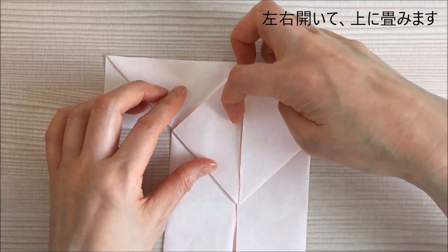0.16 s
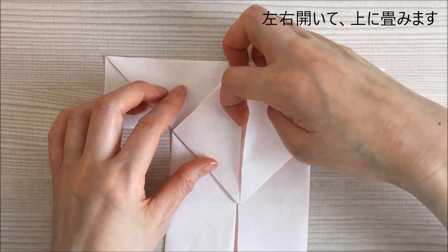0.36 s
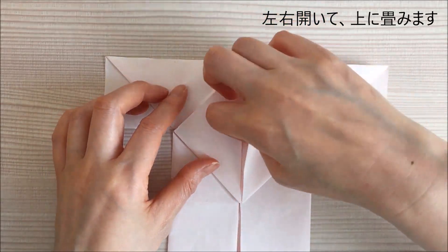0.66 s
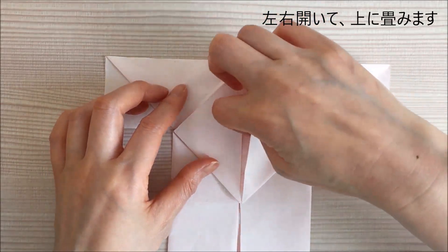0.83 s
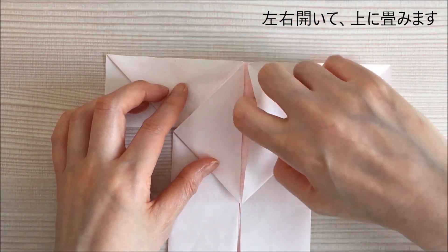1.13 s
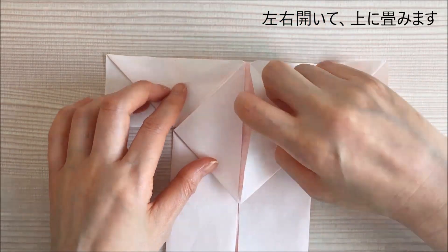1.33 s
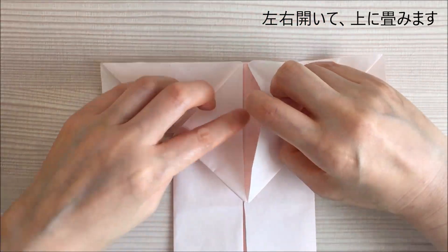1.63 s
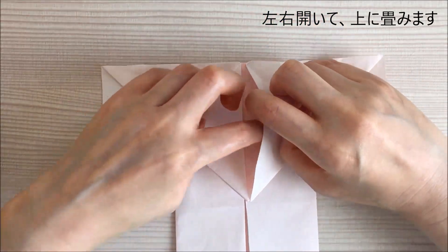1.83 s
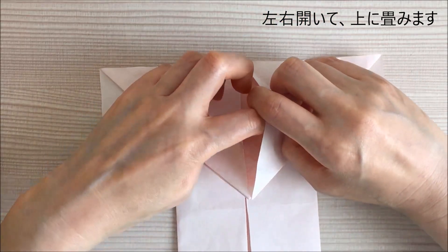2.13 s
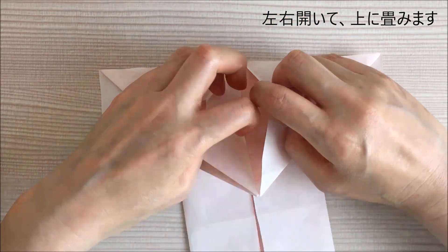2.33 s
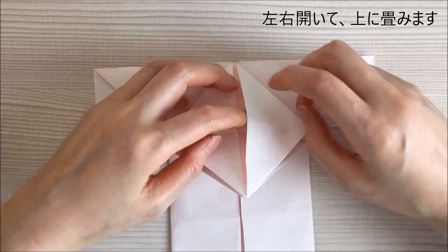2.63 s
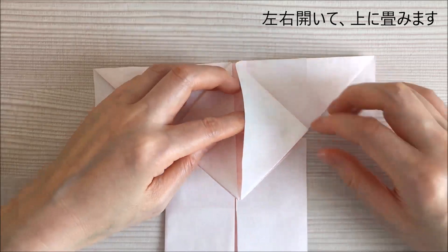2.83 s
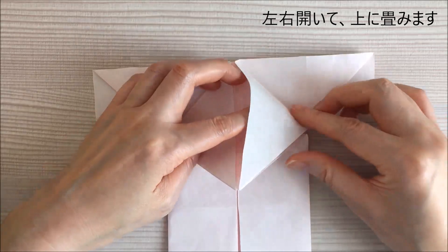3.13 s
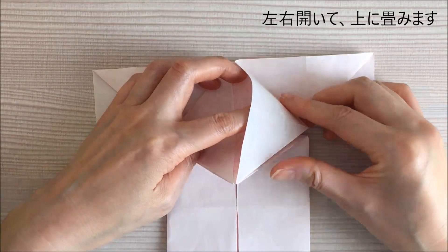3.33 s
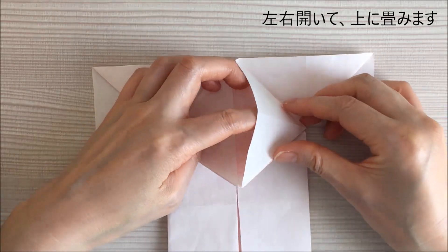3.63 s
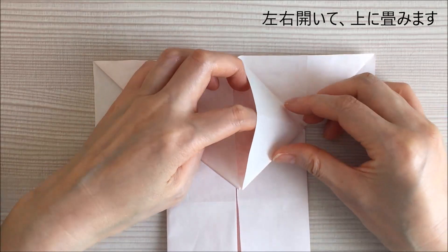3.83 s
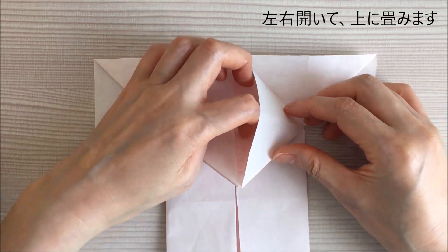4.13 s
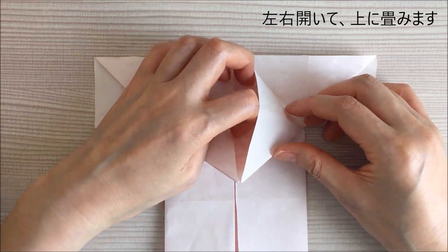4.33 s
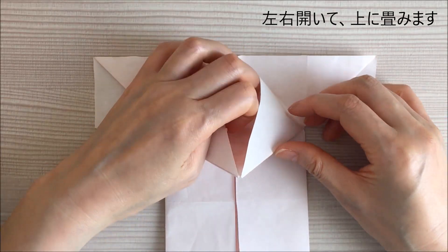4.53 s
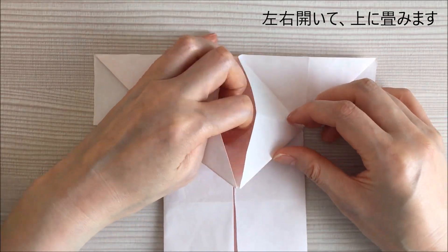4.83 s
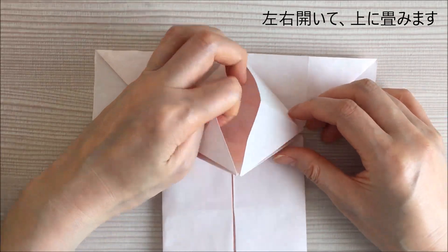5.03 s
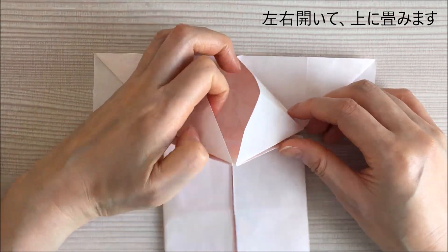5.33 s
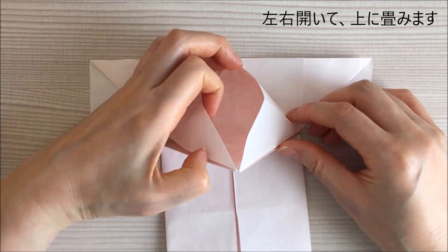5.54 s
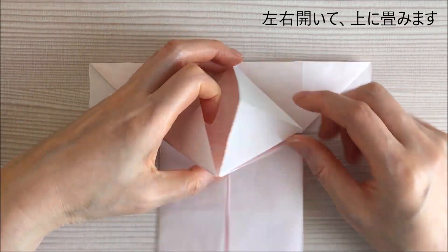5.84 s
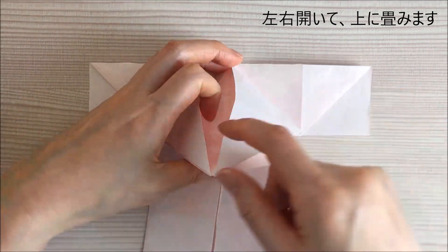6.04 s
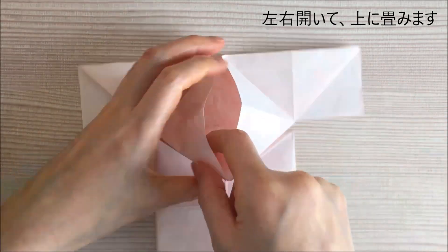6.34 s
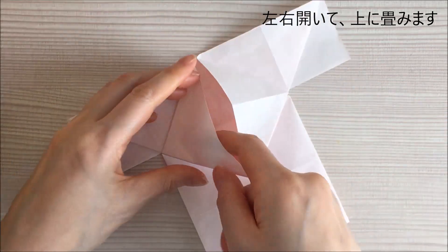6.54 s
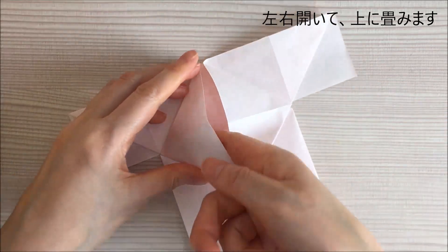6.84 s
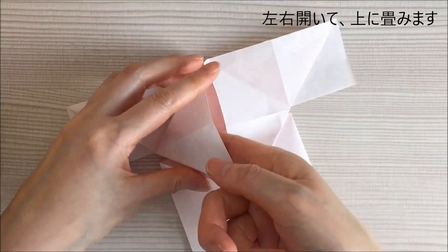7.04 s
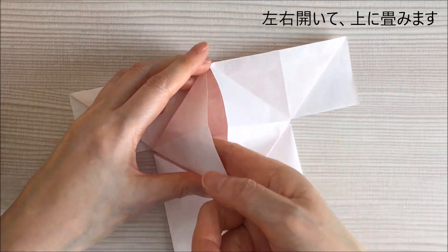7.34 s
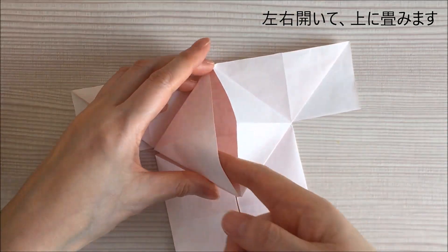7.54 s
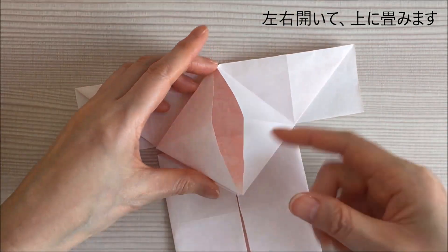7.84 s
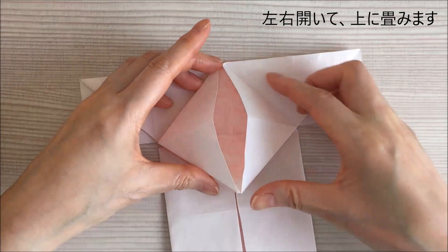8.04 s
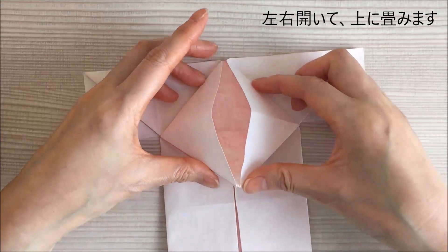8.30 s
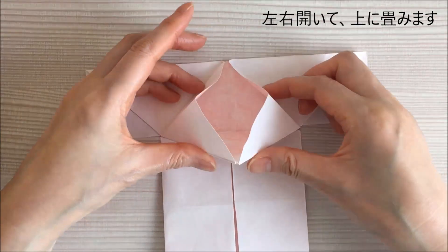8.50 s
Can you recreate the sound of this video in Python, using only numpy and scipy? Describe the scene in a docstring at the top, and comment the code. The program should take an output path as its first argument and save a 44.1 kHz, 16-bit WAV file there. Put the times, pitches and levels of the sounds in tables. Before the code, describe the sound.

In a small quiet room, close to the microphone, two hands open and refold a layered paper model on a wooden table. A faint steady hush and restless light rustle run throughout. The first second has thin, soft slides and a crisp tick near 0.5 s. From 1.1 to 1.9 s a flurry of small snaps crackles, with soft finger pats. A stronger pop comes at 2.5 s, then bright, quick clicks at 3.1 to 3.3 s and a quieter lull. A sharp snap at 4.3 s leads into firmer rubbing and fuller crackles around 4.8 to 5.2 s, and another pop at 5.6 s. Brisk swishes and dull pats fill 6.2 to 6.9 s, capped by the strongest snap at 6.95 s. Softer sliding follows, with a pat near 7.6 s, brief scrapes near 7.8 s, and light crinkles to a final small snap at 8.6 s.

```python
"""Two hands open and refold a paper model on a wooden table, close to one microphone in a small room.
From the start lie a steady hush of noise and the restless rustle of held paper, both faint.
Fingers and flaps soon slide in runs of tiny slips, each stroke setting off a few small crinkles.
Then fingertips pat the paper down, as noise bursts with a push, and creases buckle as sharp facet snaps.
Folded layers prolong the paper sounds at a few pitches, and a brief diffuse room tail follows."""
import sys
import numpy as np
from scipy import signal
from scipy.fft import rfft, irfft, next_fast_len
from scipy.io import wavfile
from scipy.ndimage import uniform_filter1d

SR = 44100
rng = np.random.default_rng(int(sys.argv[2]) if len(sys.argv) > 2 else 0)


def generate_wav(signal):
    """Clip the signal to [-1, 1] and save it as 16-bit WAV at the path in sys.argv[1]."""
    frames = np.transpose(np.atleast_2d(signal))
    scaled = np.clip(frames, -1, 1) * 32767
    pcm = np.round(scaled).astype(np.int16)
    wavfile.write(sys.argv[1], SR, pcm)


N = 382347

# steady noise of the quiet room: f/Hz, relative spectral level/dB per Hz
HUSH_SPECTRUM = [(25, -23), (52, 1.5), (80, -4), (200, -6), (500, -12.5), (1000, -13.5), (2000, -14),
                 (4000, -14.5), (8000, -23.5), (16000, -28)]
# skin or paper sliding on paper: start t/s, end t/s, level/dB at full speed, rise below the shared
# stroke pitch/(dB/octave), fall above it/(dB/octave), resonance of the rubbed flap f/Hz
STROKES = [(0.01, 0.185, -65.5, 16, 24, 3250), (0.252, 0.398, -59, 26, 9.5, 3200),
           (0.665, 0.959, -56.5, 12, -0.5, 5860), (0.713, 0.94, -62, 21, 23, 3140),
           (1.014, 1.125, -59, 12, 3.5, 5900), (1.447, 1.664, -47, 5, 4, 3400),
           (1.62, 1.904, -57.5, 3.5, 5, 3180), (1.899, 2.026, -49, 5, 5, 12000),
           (2.029, 2.263, -62.5, 3.5, 3, 3260), (2.393, 2.466, -55.5, -2, 0, 3200),
           (2.624, 2.809, -49.5, 4.5, 4, 5500), (2.736, 3.038, -58, 5.5, 3.5, 5640),
           (2.984, 3.156, -58, 8, 5, 5700), (3.31, 3.53, -67.5, 9, 2, 3570),
           (3.653, 3.748, -56, 7.5, 6.5, 4530), (3.753, 3.853, -61, 6, 3, 8000),
           (4.129, 4.225, -47.5, 3.5, 1, 3340), (4.187, 4.363, -49.5, 5, 7.5, 3500),
           (4.473, 4.596, -55, 5.5, 5.5, 3900), (4.575, 4.691, -47.5, 3, 7, 3950),
           (4.695, 4.898, -56, 4, 9, 4640), (5.044, 5.118, -43, 12, 6, 8500),
           (5.105, 5.184, -45, 2.5, 5, 3770), (5.225, 5.444, -53.5, 7, -3, 8800),
           (5.396, 5.693, -57.5, 6, 4.5, 9000), (5.695, 5.876, -57, 2.5, 2.5, 1960),
           (5.944, 6.051, -54, 5, 5, 8200), (6.194, 6.35, -46.5, 7, 2, 3780),
           (6.255, 6.322, -40.5, 1, 6, 1120), (6.329, 6.431, -50.5, 26, 3.5, 1670),
           (6.416, 6.572, -46, 8, 3, 5700), (6.547, 6.674, -53, 5, 0.5, 8400),
           (6.71, 6.852, -61, 5.5, 7.5, 3180), (6.797, 6.98, -51, 11, 5.5, 6040),
           (6.926, 7.042, -47, 4, 15, 1900), (7.05, 7.327, -70.5, 5.5, 3, 4000),
           (7.418, 7.783, -62.5, 5.5, 6.5, 1605), (7.577, 7.694, -48.5, 4.5, 3.5, 644),
           (7.766, 7.904, -48.5, 5, 1, 5600), (7.822, 7.896, -39.5, 6, 4.5, 990),
           (8.151, 8.246, -50.5, 3.5, 1, 4500), (8.274, 8.406, -57, 1, 3.5, 2360),
           (8.509, 8.658, -56.5, 3, 7, 2800)]
# fingertips landing: t/s, energy level/dB, pitch f/Hz
FINGERTIP_PATS = [(0.111, -39, 170), (1.453, -24, 200), (1.784, -29, 190), (2.7, -22, 188),
                  (2.72, -37, 330), (4.636, -29.5, 190), (4.841, -21.5, 387), (5.13, -24.5, 206),
                  (6.289, -23.5, 370), (6.389, -22.5, 373), (7.643, -21, 510), (8.222, -38, 124),
                  (8.35, -35, 230)]
# creases that buckle: t/s, energy level/dB, brightest pitch f/Hz, fall above it/(dB/octave)
CREASE_SNAPS = [(0.121, -32.5, 1870, 1.5), (0.4151, -21, 3000, 9), (0.5197, -8, 3700, 7.5),
                (0.6526, -28.5, 3230, 11.5), (0.9568, -29, 1500, 10.5), (1.0637, -19.5, 2560, 10),
                (1.1685, -9, 4260, 17), (1.3138, -13, 3600, 16.5), (1.333, -22, 3200, 19),
                (1.3514, -6, 2730, 13.5), (1.3975, -13, 3450, 25), (1.4118, -17, 2400, 8.5),
                (1.449, -19, 2000, 11.5), (1.5734, -12.5, 4200, 26), (1.5965, -13, 2600, 9),
                (1.6031, -16.5, 1310, 14), (1.755, -17.5, 3100, 10.5), (1.7822, -9.5, 2290, 10),
                (1.8024, -23, 2780, 23), (1.839, -24, 2500, 13), (1.9216, -15.5, 3200, 10.5),
                (2.1261, -23, 3290, 22), (2.2912, -27.5, 2500, 6.5), (2.468, 1.5, 1500, 5.5),
                (2.6919, -12.5, 3900, 2.5), (2.7461, -18, 2700, 16), (2.979, -23, 2800, 12),
                (3.102, -2.5, 4410, 19), (3.1256, -2.3, 6800, 24), (3.1452, -5, 4400, 22.5),
                (3.244, -32, 1600, 22), (3.291, 1.4, 8430, 30.5), (3.4986, -26.5, 6000, 5),
                (3.791, -26, 4700, 7.5), (3.9043, -22.5, 2350, 11.5), (4.2676, 1.6, 3160, 12),
                (4.4901, -25, 1830, 19), (4.7566, -22, 900, 10), (4.8041, 3.5, 1750, 3.5),
                (4.8509, -6.5, 2100, 5), (4.9694, 2, 2430, 7), (5.009, -15, 2550, 12.5),
                (5.1892, -7, 1730, 7), (5.367, -25.5, 1700, 9.5), (5.5715, 4, 2670, 9.5),
                (5.574, -10, 1130, 25.5), (5.6295, -19.5, 900, 3), (5.974, -22.5, 2260, 13),
                (6.2052, -28, 1780, 9), (6.387, -15.5, 1400, 9), (6.677, -27, 1800, 22),
                (6.9496, 6, 2790, 10.5), (6.9945, 1, 4700, 14), (7.4744, -28, 2720, 15),
                (7.6197, -11.5, 1790, 7), (8.2225, -17.5, 4280, 8), (8.3839, -24, 2200, -5.5),
                (8.504, -17.5, 3100, 12.5), (8.6433, -8, 2941, 16)]
# resonances of the folded layers: f/Hz, width f/Hz, level/dB
LAYER_RESONANCES = [(987, 24, 0.5), (2030, 64, 0), (2215, 75, -18.5), (3133, 76, -8.5), (4190, 140, -7),
                    (6760, 98, -5)]
# spectrum of what the room sends back: f/Hz, level/dB
ROOM_SPECTRUM = [(150, -8.5), (600, -8), (1200, -10.5), (2100, -11), (4000, -15.5), (9000, -16),
                 (16000, -24.5)]

HUSH_DB = -69  # RMS level before the recorder
STROKE_HZ = 3020  # brightest pitch of all sliding
ATTACK_S, RELEASE_S = 0.039, 0.038  # the hand gets up to speed, glides on, and stops
SWELL_DB = 2  # a stroke is this much stronger in the middle than at its ends
# a large facet is dark and drops steeply below its pitch
FACET_HZ, FACET_RISE_DB, RISE_POWER = 3050, 11, 0.99  # rise/(dB/octave) at FACET_HZ for a 0 dB snap
# a gentle buckle is fuller and lasts longer than a hard one
SNAP_T60_S = 0.014  # ring of a 0 dB snap
SLOWING_PER_DB, FILLING_PER_DB = 0.0336, 0.05  # exponential growth of ring, flattening of rise
ROOM_T60_S, ROOM_TREBLE_T60_S = 0.19, 0.17
TOP_HZ = 16100  # upper edge of the recorder


def undb(db):
    """Level law: convert decibels to an amplitude gain."""
    return 10 ** (np.asarray(db) / 20)


def unit(x):
    """Energy normalisation: scale the sum of squares to one."""
    return x / np.sqrt(np.sum(x ** 2))


def freqs(size):
    """Fourier bins: frequencies of a spectrum in Hz, kept above zero."""
    return np.maximum(np.arange(size // 2 + 1) * SR / size, 1)


def gain_at(hz, points):
    """Interpolation: read a spectrum of (f/Hz, level/dB) points on a log-frequency axis."""
    f, db = np.transpose(points)
    return undb(np.interp(np.log(hz), np.log(f), db))


def colour(x, points):
    """Linear filtering: shape a steady sound by a spectrum."""
    size = next_fast_len(len(x))
    shaped = rfft(x, size) * gain_at(freqs(size), points)
    return irfft(shaped, size)[:len(x)]


def causal(gain):
    """Minimum phase: the spectrum with this gain that starts at once and rings afterwards."""
    cepstrum = irfft(np.log(gain + 1e-9))
    half = len(cepstrum) // 2
    folded = np.r_[cepstrum[0], 2 * cepstrum[1:half]]
    return np.exp(rfft(folded, 2 * half))


def hump(f, hz, rise_db, fall_db, knee=0.23):
    """Broad spectral peak: straight slopes in dB/octave joined by a knee rounded in octaves."""
    octaves = np.log2(f / hz)
    away = np.hypot(octaves, knee)
    below = (away - octaves) / 2
    above = (away + octaves) / 2
    return undb(-rise_db * below - fall_db * above)


def fading(t60, size):
    """Exponential decay: noise that falls 60 dB in t60 seconds, never faster than 2 ms."""
    decay = np.exp(-np.log(1000) * np.arange(size) / SR / max(t60, .002))
    return rng.standard_normal(size) * decay


def walk(rate):
    """Random modulation: a smooth wander through `rate` values a second, with a spread near one."""
    steps = np.arange(N) / SR * rate
    count = 256 + int(steps[-1])
    return 1.2 * np.interp(steps, np.arange(count), rng.standard_normal(count))


def add(out, s, x):
    """Superposition: mix a short sound in at a time in seconds."""
    start = max(int(s * SR), 0)
    out[start:start + len(x)] += x[:max(N - start, 0)]


def resonance(f, hz, width):
    """Damped resonance: its complex response, one at its centre."""
    return 1 / (1 + 1j * (f ** 2 - hz ** 2) / (f * width))


def facet(hz, rise_db, fall_db, t60, crack, treble_share=0.75, treble_hz=6000, size=4096):
    """Impulse response: a jolt cracks, then bending waves bounce between folds; short ones die first."""
    f = freqs(size)
    treble = f ** 4 / (f ** 4 + treble_hz ** 4)  # share of the energy in short waves
    long_waves = rfft(unit(fading(t60, size))) * causal(np.sqrt(1 - treble))
    short_waves = rfft(unit(fading(t60 * treble_share, size))) * causal(np.sqrt(treble))
    spectrum = crack + long_waves + short_waves
    # every facet has its own close resonances, which share the energy evenly over each stretch of pitch
    broad = np.sqrt(uniform_filter1d(np.abs(spectrum) ** 2, size=130))
    shape = causal(hump(f, hz, rise_db, fall_db) / broad)
    return unit(irfft(spectrum * shape)[:size // 2])


def hush():
    """Stationary noise: the steady rumble and hiss of the quiet room."""
    noise = unit(colour(rng.standard_normal(N), HUSH_SPECTRUM)) * np.sqrt(N)
    return noise * undb(HUSH_DB)


def slips(rate=2500, scatter_db=3.0, smooth=.5):
    """Stick-slip: fibres let go `rate` times a second, in many small slips and a few larger ones."""
    caught = rng.random(N) < rate / SR
    signs = rng.choice([-1, 1], N)
    sizes = undb(scatter_db * np.minimum(rng.exponential(size=N), 4)) * signs
    grain = unit(caught * sizes)
    return unit(grain + smooth * unit(rng.standard_normal(N))) * np.sqrt(N)


def holding(db=-76, unrest_db=4, unrest_rate=14, hz=3000, rise_db=6, fall_db=5, size=4096):
    """Stick-slip at near rest: fingers that hold the paper still make a faint restless rustle."""
    response = facet(hz, rise_db, fall_db, 0.011, 1.0)
    rustle = signal.fftconvolve(slips(), response)[:N]
    return rustle * undb(db + unrest_db * walk(unrest_rate))


def flutter(x, drift_db=2, drift_rate=9, flicker_db=4.0, flicker_rate=60):
    """Band modulation: a wandering contact on the bending sheet makes each third of an octave flicker."""
    size = next_fast_len(N)
    thirds = np.clip(3 * np.log2(freqs(size) / 500), 0, 15)  # band number, counted up from 500 Hz
    spectrum = rfft(x, size)
    out = np.zeros(N)
    for k in range(16):
        overlap = np.maximum(1 - np.abs(thirds - k), 0)
        band = irfft(spectrum * overlap, size)[:N]
        out += band * undb(drift_db * walk(drift_rate) + flicker_db * walk(flicker_rate))
    return unit(out) * np.sqrt(N)


def sliding(ring_t60=0.02, crack=0.72, flap_db=1, flap_q=7, speed_power=1.25,
            judder_db=0.54, judder_rate=70, size=4096):
    """Friction-driven vibration: slips shake one facet as a juddering stroke speeds up and slows."""
    t, f = np.arange(N) / SR, freqs(size)
    friction = flutter(slips()) * undb(judder_db * walk(judder_rate))
    out = np.zeros(N)
    for start, end, db, rise_db, fall_db, flap_hz in STROKES:
        span = slice(max(int(start * SR), 0), int(end * SR))
        speeding_up = (t[span] - start) / ATTACK_S
        slowing_down = (end - t[span]) / RELEASE_S
        speed = np.clip(np.minimum(speeding_up, slowing_down), 0, 1)
        arch = 1 - np.linspace(-1, 1, len(speed)) ** 2
        swell = undb(SWELL_DB * (arch - arch.mean()))
        flap = 1 + undb(flap_db) * resonance(f, flap_hz, flap_hz / flap_q)
        sheet = rfft(facet(STROKE_HZ, rise_db, fall_db, ring_t60, crack), size)
        response = unit(irfft(sheet * flap)[:size // 2])
        drive = friction[span] * swell * speed ** speed_power
        add(out, start, undb(db) * signal.fftconvolve(drive, response))
    return out


def crinkles(over_db=20, thin_db=2.0, scatter_db=3, hz=1700, spread_octaves=0.44,
             rise_db=9, fall_db=12, t60=0.066, crack=0.6, count=3):
    """Local buckling: every stroke sets off tiny buckles, louder for a firm, full one than a thin glide."""
    out = np.zeros(N)
    for start, end, db, thinness, *_ in STROKES:  # thinness is the rise of the stroke's spectrum
        for when, strength, pitch in rng.random((count, 3)):
            tick_hz = hz * 2 ** (spread_octaves * (2 * pitch - 1))
            tick = facet(tick_hz, rise_db, fall_db, t60, crack)
            tick_db = db + over_db - thin_db * thinness + scatter_db * (2 * strength - 1)
            add(out, start + when * (end - start), undb(tick_db) * tick)
    return out


def fingertips(t60=0.035, rise_db=7, fall_db=10, push=0.42, size=8192):
    """Soft impact: a push on the table, with the layers of paper settling under it."""
    out = np.zeros(N)
    for s, db, hz in FINGERTIP_PATS:
        jolt = unit(fading(t60, size))
        jolt[0] += push
        shape = causal(hump(freqs(size), hz, rise_db, fall_db))
        add(out, s, undb(db) * unit(irfft(rfft(jolt) * shape)))
    return out


def creases(crack=0.53, bass_hz=200):
    """Snap-through buckling: facets flip over, too small to radiate much bass."""
    out = np.zeros(N)
    for s, db, hz, fall_db in CREASE_SNAPS:
        size_rise_db = FACET_RISE_DB * (FACET_HZ / hz) ** RISE_POWER
        rise_db = size_rise_db * np.exp(FILLING_PER_DB * db)
        t60 = SNAP_T60_S * np.exp(-SLOWING_PER_DB * db)
        add(out, s, undb(db) * facet(hz, rise_db, fall_db, t60, crack))
    return signal.sosfilt(signal.butter(2, bass_hz, "highpass", fs=SR, output="sos"), out)


def layers(x, size=8192):
    """Modal resonance: the folded layers and the air between them ring on at a few pitches."""
    f = freqs(size)
    ringing = sum(undb(db) * resonance(f, hz, width) for hz, width, db in LAYER_RESONANCES)
    return x + signal.fftconvolve(x, irfft(ringing)[:size // 2])[:N]


def room(x, delay_s=0.0036, split_hz=4000, size=32768):
    """Reverberation: walls and table send back a short diffuse tail whose treble dies first."""
    f = freqs(size)
    treble = f ** 2 / (f ** 2 + split_hz ** 2)  # share of the energy in the treble
    low_tail = rfft(unit(fading(ROOM_T60_S, size))) * np.sqrt(1 - treble)
    high_tail = rfft(unit(fading(ROOM_TREBLE_T60_S, size))) * np.sqrt(treble)
    tail = irfft((low_tail + high_tail) * causal(gain_at(f, ROOM_SPECTRUM)))[:size // 2]
    response = np.r_[np.zeros(int(delay_s * SR)), tail]
    return signal.fftconvolve(x, response)[:N]


def scene():
    """Superposition: paper and fingers, their echo, and the quiet room."""
    folded = layers(holding() + sliding() + crinkles() + creases())
    paper = folded + fingertips()
    return (paper + room(paper) + hush())[None]


def record(dry):
    """Band limiting: the recorder drops the deepest rumble and cuts the top."""
    thinned = signal.sosfilt(signal.butter(3, 42, "highpass", fs=SR, output="sos"), dry)
    return signal.sosfilt(signal.ellip(10, .2, 70, TOP_HZ, fs=SR, output="sos"), thinned)


dry = scene()
out = record(dry)
generate_wav(out)
```